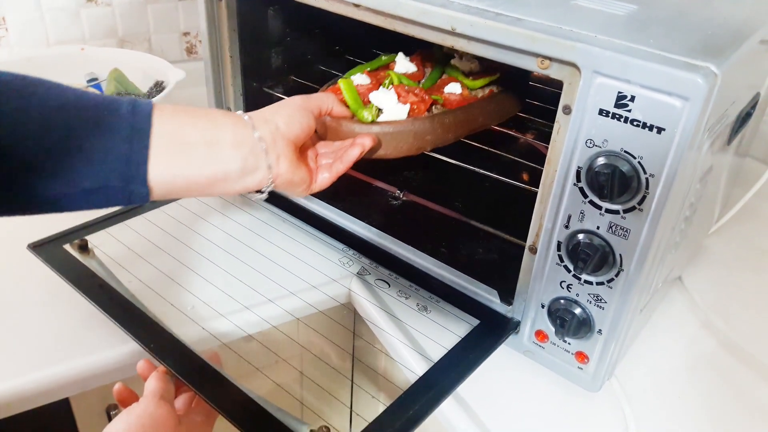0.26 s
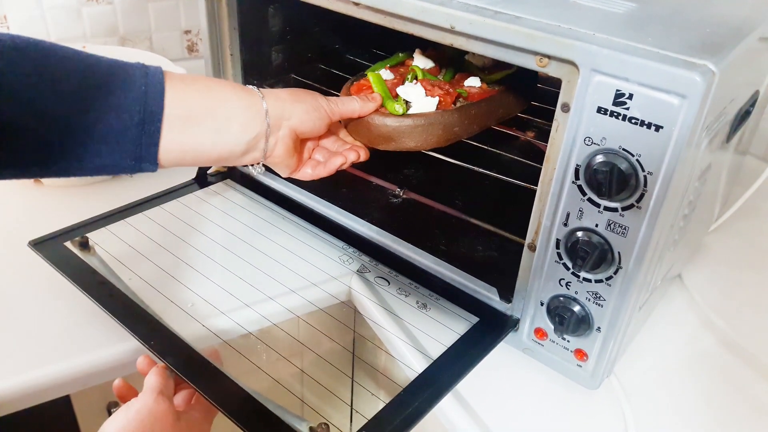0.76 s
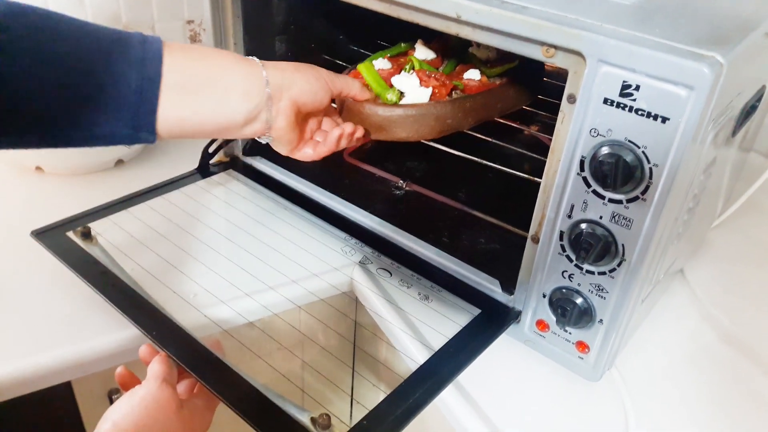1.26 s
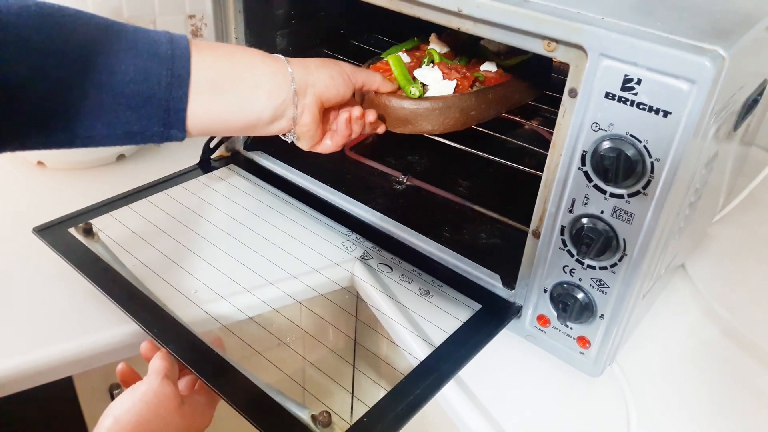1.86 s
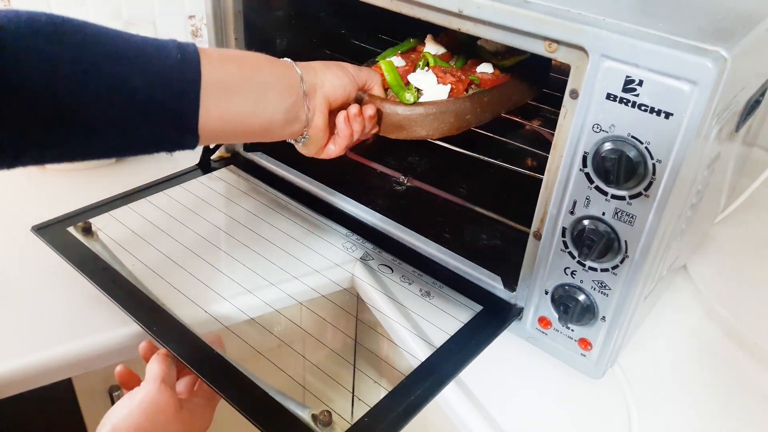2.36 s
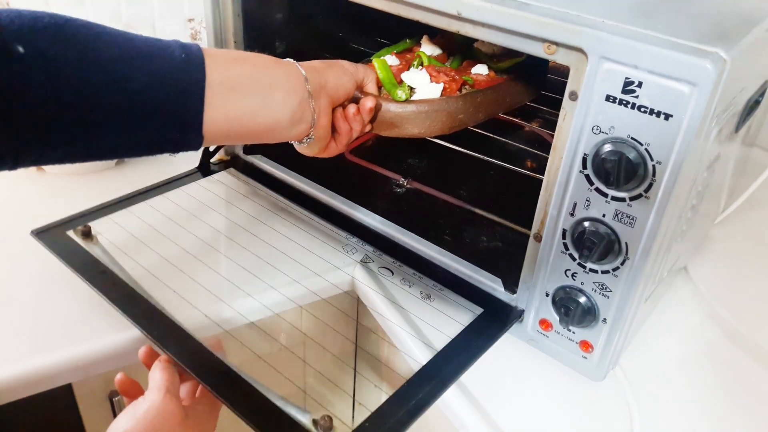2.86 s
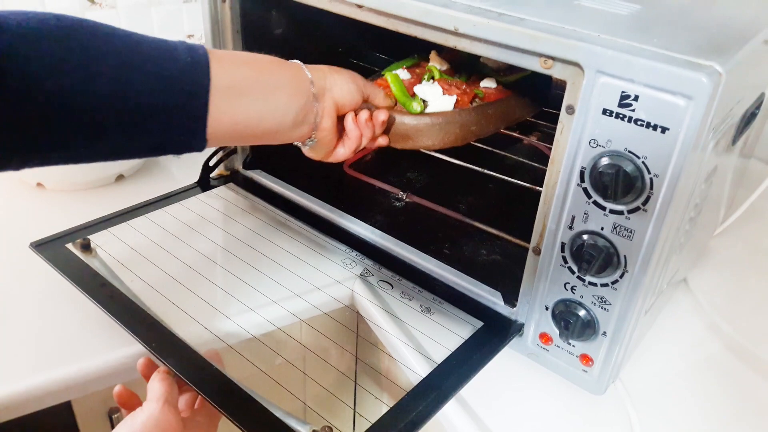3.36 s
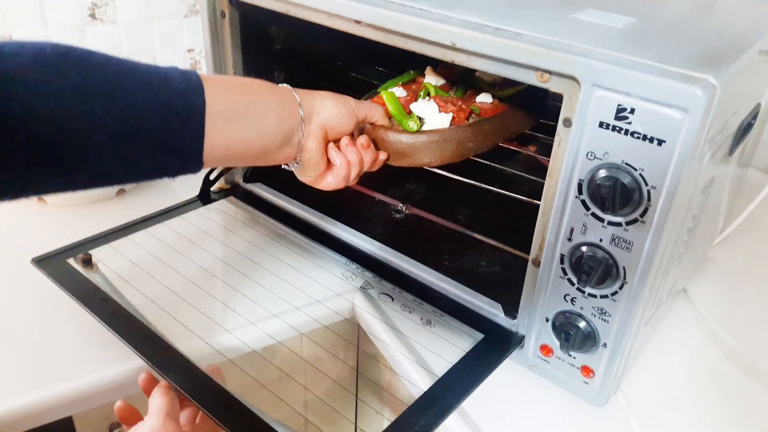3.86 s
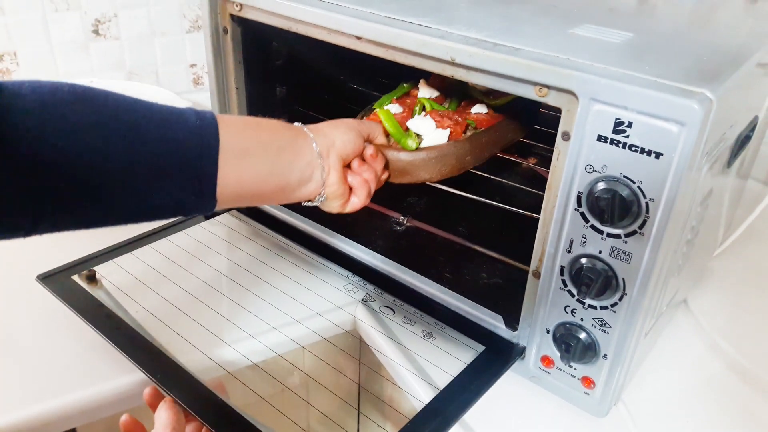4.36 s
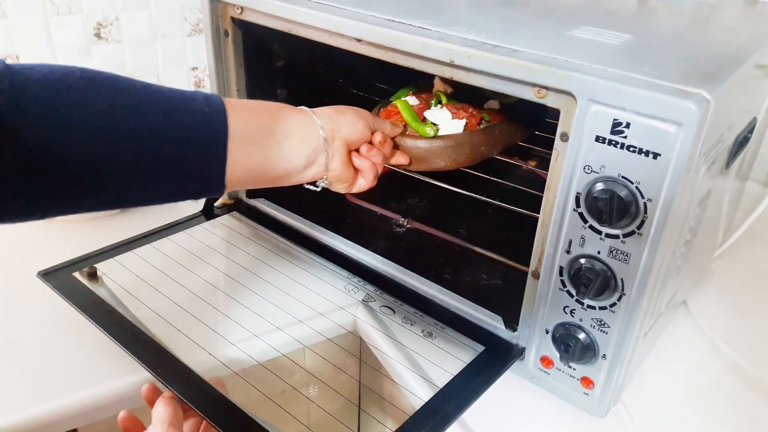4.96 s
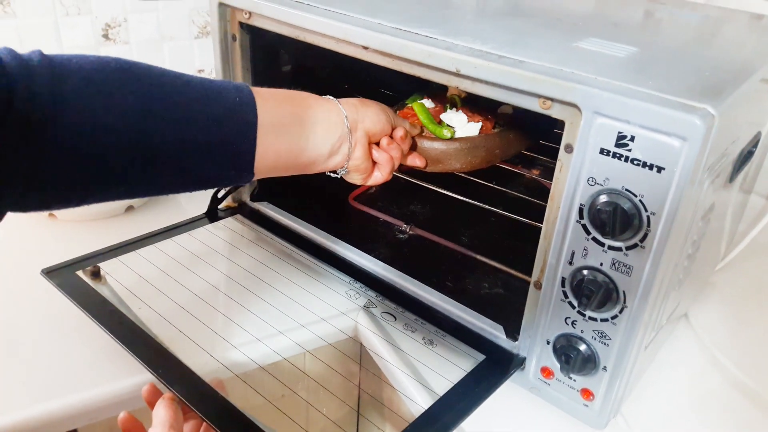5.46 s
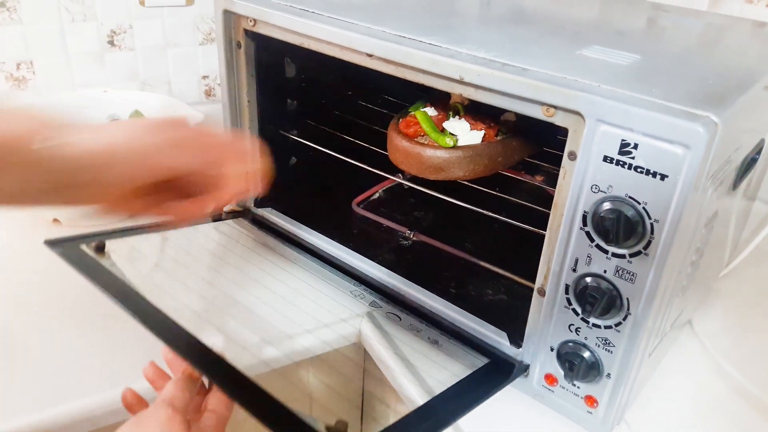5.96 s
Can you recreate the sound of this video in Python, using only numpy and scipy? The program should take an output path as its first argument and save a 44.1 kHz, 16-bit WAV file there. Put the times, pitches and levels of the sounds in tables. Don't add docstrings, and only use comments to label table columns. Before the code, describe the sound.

Close, jerky scraping of a clay dish over oven rack wires, with hard knocks, clinks and tinny hum, while a bird chirps faintly.

```python
import sys
import numpy as np
from scipy import signal
from scipy.fft import rfft, irfft
from scipy.io import wavfile
from scipy.ndimage import uniform_filter1d

SR = 44100
rng = np.random.default_rng(int(sys.argv[2]) if len(sys.argv) > 2 else 0)


def rack_gain(trim_db):
    fader = np.asarray(trim_db, float)
    return 10 ** (fader / 20)


def persist_wave(psi):
    counts = np.round(np.clip(psi, -1, 1) * 32767).astype(np.int16)
    wavfile.write(sys.argv[1], SR, np.atleast_2d(counts).T)


N = 273323

# (start [s], length [s], grind [dB], shell drone re grind [dB], bite re grind [dB])
SHOVES = [(-.03, 0.075, -42, 0, -4.5), (0.079, 0.049, -34, -1.5, -4), (0.167, 0.12, -35.5, -1, -5),
          (0.275, 0.12, -35.5, -4.5, -6.5), (0.37, 0.11, -37.5, -4, -4), (0.46, 0.062, -29.5, -9, -3),
          (0.515, 0.022, -37, 6, -20), (1.106, 0.092, -42.5, 0, -5.5), (1.215, 0.21, -51, 3, 3),
          (1.41, 0.21, -43.5, 2, -5), (1.596, 0.058, -41.5, -2.5, -5), (1.637, 0.097, -48.5, 0, 0),
          (1.787, 0.053, -63.5, 15, -25), (2.11, 0.091, -46.5, 3, -6), (2.244, 0.041, -40, -10, -8.5),
          (2.317, 0.028, -49.5, 5.5, -13), (2.429, 0.071, -45, 6.5, -4), (2.519, 0.064, -44.5, 5, -4),
          (2.7, 0.095, -48, 6.5, -4), (2.805, 0.084, -50.5, 3.5, -5), (3.03, 0.028, -46, 4, -7.5),
          (3.089, 0.027, -32.5, -7, -4.5), (3.248, 0.053, -45.5, -5, -11), (3.332, 0.11, -47.5, 4.5, -6.5),
          (3.458, 0.029, -52, -17, -5), (3.675, 0.038, -59.5, 3.5, 0), (3.969, 0.036, -48.5, 3, -9),
          (4.027, 0.093, -40, 7.5, -3), (4.112, 0.093, -42, 4.5, -8), (4.257, 0.019, -45, 9.5, -10.5),
          (4.404, .09, -43.5, -1.5, -6), (4.484, 0.069, -29, -2, -6), (4.54, 0.085, -29, -2, -5.5),
          (4.823, 0.037, -50, 0, -11), (4.956, 0.088, -37, -1.5, -1.5), (5.08, .025, -36.5, 1, -2.5),
          (5.122, 0.031, -32.5, -1.5, -5.5), (5.227, 0.058, -36, -7, -6), (5.329, 0.028, -38.5, 3.5, 0),
          (5.38, 0.036, -39.5, -0.5, -5)]
# (frequency [Hz], density [dB per Hz])
CLAY_COLOUR = [(210, -11.5), (350, -13), (557, -4.5), (677, -12), (897, -10.5), (1080, -8.5), (1430, -4),
               (1610, -6), (3360, -4.5), (6500, -30.5), (8450, -52.5), (14300, -120)]
# (frequency [Hz], density [dB per Hz])
GRIT_COLOUR = [(2940, -29), (5000, 12), (5300, 6), (6320, 4.5), (6630, 2), (8420, 0), (9930, -16),
               (11800, -8), (14300, -12), (16000, -28)]
# (frequency [Hz], density [dB per Hz])
BITE_COLOUR = [(1200, -31.5), (2200, -3), (3000, -0.5), (4400, 1.5), (5300, -5.5), (6400, -9.5),
               (8500, -31)]


def slide():
    # (frequency [Hz], width [Hz], level [dB])
    dish = [(670, 48, -2.5), (981, 49, -13), (1060, 14, -8), (1180, 8.3, -15.5), (1440, 11.7, -11),
            (1710, 69, -20.5), (1950, 34, -24), (2200, 14, -73), (2600, 32, -63), (3123, 32, -5.5),
            (4360, 91, -23), (5450, 99, -31), (6440, 110, -26)]
    grind_db, _, grit_db, _, _ = sliding()
    grains = evened(bumps(1400, 4.0, 0.55) * judder(1.0, size=600))
    shaken = grains * rack_gain(grind_db)
    touch = wander(3.5, 20, count=len(dish))
    rings = sum(rack_gain(db) * ring(shaken * gain, hz, width) for (hz, width, db), gain in zip(dish, touch))
    body = rack_gain(-0.5) * colour(shaken, CLAY_COLOUR) + rack_gain(-10.5) * rings
    grit = colour(shaken * rack_gain(grit_db), GRIT_COLOUR)
    return body + grit + colour(grains * rack_gain(bite()), BITE_COLOUR)


def sliding():
    # (time [s], grit re grind [dB], drone pitch [Hz], rack hum re grind [dB])
    spot = [(0, -15, 195.8, -4), (.25, -22.5, 202.7, -5.5), (.45, -15.5, 193.3, -23), (.7, -19, 218.6, 3),
            (1.151, -18.5, 179, -3.5), (1.5, -18, 194.9, -17), (2.1, -4, 185, -2), (2.3, -39, 186.7, -21),
            (2.5, -11, 191.4, -1), (3.101, -36, 205.5, -11), (3.45, -37, 196.3, 6.5), (3.8, 7, 199.1, -31),
            (4.1, -24, 195.3, -10), (4.35, -52, 183.7, 5), (4.501, -21, 194, 5), (4.649, -20, 213.8, -11),
            (5.0, -12, 199, -5.5), (5.45, -29, 204.1, -2.5)]
    shake = 221, -28.5, 80, -71.5
    grind_db = strokes([row[:3] for row in SHOVES])
    drone_db = strokes([(s, length, db + more) for s, length, db, more, _ in SHOVES], *shake)
    s, *columns = np.transpose(spot)
    grit_db, drone_hz, hum_db = (np.interp(np.arange(N) / SR, s, c) for c in columns)
    return grind_db, drone_db - grind_db, grit_db, drone_hz, hum_db


def bite():
    return strokes([(s, length, db + more) for s, length, db, _, more in SHOVES])


def strokes(rows, release_db_per_s=324, creep_db=-17, creep_db_per_s=72, rest_db=-67.5):
    grip_s = 0.044
    t = np.arange(0, N / SR + 0.01, 0.002)
    power = np.full(len(t), rack_gain(rest_db) ** 2)
    for start, length, db in rows:
        after = np.maximum(t - start - length, 0)
        grip = np.clip((t - start) / grip_s + 0.44, 0, 1)
        fall = rack_gain(-release_db_per_s * after) + rack_gain(creep_db - creep_db_per_s * after)
        power += (grip * rack_gain(db) * fall) ** 2
    return np.interp(np.arange(N) / SR, t, 10 * np.log10(power))


def bumps(per_s, spread_db, hiss):
    size = rack_gain(spread_db * np.minimum(rng.exponential(1, N), 4)) * rng.choice([-1, 1], N)
    clicks = evened(size * (rng.random(N) < per_s / SR))
    return evened(clicks + hiss * rng.standard_normal(N))


def judder(depth_db, size):
    return rack_gain(depth_db * evened(uniform_filter1d(rng.standard_normal(N), size)))


def knocks():
    # (frequency [Hz], level [dB], t60 [s])
    wire_rings = [(662, -10, 0.3), (977, -15, 0.14), (1362, -17, 0.18), (1950, -17, 0.3), (2130, -15, .18),
                  (2360, -20, .2)]
    # (time [s], level [dB], frequency [Hz], t60 [s])
    clinks = [(1.185, -34, 680, 0.022), (2.25, -46, 740, 0.04), (2.49, -40.5, 540, .1),
              (2.735, -40, 1520, 0.047), (3.098, -30, 1200, 0.048), (3.1, -31.5, 920, 0.078),
              (3.11, -40, 950, .06), (3.4, -29, 2130, 0.089), (1.605, -35.5, 1100, 0.064),
              (1.4, -30, 2000, 0.03), (3.371, -27, 1950, 0.031), (3.376, -34, 1000, 0.05),
              (.49, -36, 620, 0.082), (4.032, -33, 672, 0.15), (4.572, -29, 580, 0.055),
              (5.128, -26, 680, 0.036)]
    t = np.arange(6000) / SR
    out, crack, tick, blows = np.zeros((4, N))
    hits = contacts()
    chatter = rng.standard_normal((len(hits), len(t)))
    rise = 1 - np.exp(-t / 0.0007)
    for (s, db, low_hz, high_hz, _, tick_db), noise in zip(hits, chatter):
        add(crack, s, rack_gain(db - 7 - 60 * t / 0.087) * rise * noise)
        add(tick, s, rack_gain(db + tick_db - 1.5 - 60 * t / 0.044) * rise * noise)
        add(blows, s, rack_gain(db - 60 * t / 0.009) * noise)
        low = rack_gain(-9.0 - 60 * t / 0.045) * np.sin(2 * np.pi * low_hz * t)
        high = rack_gain(-4.0 - 60 * t / 0.023) * np.sin(2 * np.pi * high_hz * t)
        add(out, s, rack_gain(db) * rise * (low + high))
    for s, db, hz, t60 in clinks:
        fade = rack_gain(db - 60 * (t / min(t60, 0.085)) ** 2)
        add(out, s, fade * (1 - np.exp(-t / 0.00088)) * np.sin(2 * np.pi * hz * t))
    wires = sum(rack_gain(db) * ring(blows, hz, 2.2 / min(t60, 0.3)) for hz, db, t60 in wire_rings)
    cracks = colour(crack, CLAY_COLOUR) + rack_gain(-5.0) * colour(crack, BITE_COLOUR)
    return out + cracks + colour(tick, GRIT_COLOUR) + rack_gain(-11.0) * wires


def contacts():
    # (time [s], peak [dB], low ring [Hz], high ring [Hz], tick re peak [dB])
    hard = [(.079, -34, 660, 1950, -17), (.093, -27.5, 1060, 2500, -24), (2.525, -35, 1410, 2750, -29),
            (4.552, -16, 1921, 4210, -13), (4.596, -21, 680, 3000, -4), (5.097, -28.5, 1060, 2880, -12),
            (5.129, -23.5, 655, 1510, -15), (5.417, -31.5, 1440, 3000, -9), (0.108, -19, 1200, 2905, -6.5),
            (0.477, -22, 680, 2060, -7), (0.513, -16.5, 1440, 1950, -13), (1.417, -26.5, 1440, 3000, -7),
            (1.6, -18, 1280, 2080, -11.5), (2.133, -25, 1320, 2110, -34), (2.241, -36, 1830, 4140, -14),
            (2.248, -22.5, 670, 2730, -32), (2.715, -26, 1610, 2180, -16), (3.093, -16.5, 1130, 3090, -6.5),
            (3.365, -27.5, 1300, 1700, -8), (3.37, -20.5, 1430, 2260, -31), (4.027, -18, 684, 2600, -20),
            (4.035, -18.5, 698, 1920, -11), (4.108, -17.5, 1120, 2250, -26),
            (4.255, -18, 1670, 2150, -17.5), (4.482, -13.5, 1600, 3540, -10.5),
            (4.507, -16, 1535, 1750, -7), (4.571, -14.5, 670, 1710, -16), (4.96, -21.5, 646, 2280, -9),
            (5.148, -28, 680, 2050, -5), (5.239, -24, 625, 2336, -14), (5.269, -22.5, 644, 3350, -23),
            (5.331, -23, 1060, 1950, -12), (5.384, -23, 1440, 3030, -7.5)]
    # (time [s], peak [dB], low ring [Hz], tick re peak [dB])
    light = [(.205, -35, 1060, -8), (.288, -32, 1220, -6), (.745, -47, 696, -6.5), (1.135, -39, 990, -22),
             (1.345, -36, 1190, -28), (1.663, -32, 1440, -4), (1.727, -39, 1183, -1),
             (1.8, -48.5, 1060, -1.5), (2.9, -36, 990, -23), (3.333, -48, 1190, -5), (3.14, -30, 1060, -23),
             (0.647, -42, 1070, -5), (1.096, -41, 1180, -12), (1.173, -29, 1060, -30),
             (1.184, -55, 575, -32), (1.364, -33.5, 1470, -3), (1.483, -30, 1060, -5.5),
             (1.564, -27.5, 1440, -28), (1.833, -39.5, 754, -26), (2.147, -30, 597, -33),
             (2.327, -30, 1270, -40), (2.436, -39.5, 674.6, -5.5), (2.49, -38, 570, -22),
             (2.545, -41, 716, -16), (2.766, -30, 670, -33), (3.029, -32.5, 1010, -18),
             (3.062, -32, 597, -15), (3.287, -29, 1410, -39), (3.504, -35.5, 610, -11),
             (3.646, -43.5, 610, -7), (3.695, -39, 1060, -23), (3.988, -33.5, 1060, -11),
             (4.179, -25.5, 690, -24), (4.378, -33.5, 1490, -40), (4.855, -34.5, 646, -6.5),
             (5.078, -29, 646.5, -26), (5.499, -55, 1060, 3.5), (5.765, -52, 622, -3),
             (6.03, -51, 1070, -5)]
    knock_thump_db, tap_thump_db, tap_high_hz = -16, -7.5, 1877
    knocked = [(s, db, low, high, knock_thump_db, tick) for s, db, low, high, tick in hard]
    tapped = [(s, db, low, tap_high_hz, tap_thump_db, tick) for s, db, low, tick in light]
    return knocked + tapped


def snaps():
    # (time [s], peak [dB])
    grains = [(0.1087, -12), (0.2, -29), (0.306, -26), (0.3206, -29), (0.3295, -20), (0.4129, -26),
              (0.5025, -18), (0.5151, -13), (1.2777, -32), (1.4207, -24), (1.5687, -22), (1.602, -24),
              (1.626, -28), (1.664, -27), (1.7383, -29), (2.138, -28), (2.1942, -31), (2.2539, -34),
              (2.3295, -37), (2.5306, -26), (2.718, -35), (3.0479, -33), (3.096, -21), (3.1395, -33),
              (3.1456, -39), (3.2929, -39), (3.3705, -17.5), (3.506, -37), (3.819, -40), (3.9934, -27),
              (4.0645, -34), (4.2578, -39), (4.4018, -38), (4.451, -27), (4.461, -33), (4.4889, -12),
              (4.5088, -9), (4.618, -24), (4.8566, -38), (4.9987, -16), (5.0304, -26), (5.0445, -19),
              (5.1007, -31), (5.1292, -27), (5.1508, -26), (5.2406, -28), (5.2693, -29), (5.3397, -30),
              (5.387, -15), (5.4372, -34)]
    t, out = np.arange(600) / SR, np.zeros(N)
    pulse = -np.exp(-((t - 0.0002) / 0.00009) ** 2)
    for (s, db), noise in zip(grains, rng.standard_normal((len(grains), len(t)))):
        add(out, s, rack_gain(db - 3.5) * (pulse + rack_gain(-18.5 - 60 * t / 0.013) * noise))
    return out


def shell():
    # (frequency [Hz], width [Hz], level [dB])
    panels = [(114, 30, -8.5), (161, 45, -5), (244.5, 20, -3.5), (410, 76, -30)]
    # (frequency [Hz], width [Hz], level [dB])
    rack = [(289, 17, -4), (306.5, 32, -16.5), (320, 110, -57)]
    # (time [s], level [dB], frequency [Hz], t60 [s])
    struck = [(.01, -34, 193.2, 0.33), (0.079, -21, 192, 0.22), (0.301, -24, 203.2, 0.36),
              (.25, -28, 253, 0.11), (0.549, -32, 307, 0.18), (0.691, -40, 195, .2),
              (2.442, -32.5, 289, 0.21), (2.529, -39, 204, 0.19), (2.931, -34.5, 193.5, 0.5),
              (3.039, -32.5, 308.6, 0.066), (3.1, -28.5, 316, 0.13), (2.312, -47, 193, 0.15),
              (0.179, -17.5, 201, 0.27), (2.054, -42, 187.3, 0.19), (4.419, -22.5, 222, 0.13),
              (5.419, -22, 191, 0.079), (2.6, -24, 210, 0.089), (2.765, -24, 207, 0.14),
              (3.136, -28.5, 205, 0.16), (0.216, -21, 308.5, 0.15), (.476, -14.5, 195, 0.13),
              (1.481, -56, 189, 0.14), (2.138, -18.5, 307, 0.11), (2.151, -31, 180, 0.59),
              (2.248, -24, 181, 0.27), (3.027, -22, 190, 0.12), (4.03, -26.5, 206, 0.57),
              (4.108, -30, 185, 0.19), (4.483, -22, 173, 0.15), (4.556, -17, 300, 0.13),
              (4.959, -35, 180, 0.24), (5.061, -27, 303.2, 0.17), (5.14, -31, 196, .24),
              (5.386, -35, 213, 0.14), (5.49, -46, 307.5, 1.6), (5.489, -54, 278.5, 0.7),
              (1.835, -37.5, 382, 0.096)]
    grind_db, drone_db, _, drone_hz, hum_db = sliding()
    push = evened(rng.standard_normal(N) * judder(2.9, size=700)) * rack_gain(grind_db)
    boom = push * rack_gain(drone_db)
    slip_hz = drone_hz * wander(0.4, 30, count=1)[0]
    slip_gain = rack_gain(grind_db + drone_db - 25.0) * judder(3.6, size=900)
    slips = slip_gain * np.sin(2 * np.pi * np.cumsum(slip_hz) / SR)
    drone = resonate(rack_gain(-3.5) * boom + slips, drone_hz, 64.5)
    out = rack_gain(-19.5) * resonate(drone, drone_hz, 64.5)
    out += sum(rack_gain(db) * ring(boom, hz, width) for hz, width, db in panels)
    out += sum(rack_gain(db) * ring(push * rack_gain(hum_db), hz, width) for hz, width, db in rack)
    t = np.arange(16000) / SR
    thump = rack_gain(-60 * t / 0.1) * np.sin(2 * np.pi * 184 * t) * (1 - np.exp(-t / 0.00027))
    for s, db, _, _, thump_db, _ in contacts():
        add(out, s, rack_gain(db + thump_db + 0.5) * thump)
    swell = (1 - np.exp(-t / 0.0056)) * np.cos(np.pi / 2 * t / t[-1])
    for s, db, hz, t60 in struck:
        add(out, s, rack_gain(db - 60 * t / t60) * np.sin(2 * np.pi * hz * t) * swell)
    return signal.sosfilt(signal.butter(4, [100, 450], "band", fs=SR, output="sos"), out)


def cavity(x, turns_per_s):
    turn = np.pi * turns_per_s * np.arange(N) / SR
    shares = [np.sqrt(2 / 3) * np.cos(turn + k * np.pi / 3) for k in range(3)]
    return sum(echoes(x * share, 0.17, 0.0006) for share in shares)


def echoes(x, t60_factor, gap_s):
    # (frequency [Hz], likeness [0-1])
    echo_same = [(60, 0.95), (200, 1), (350, 0.55), (700, 0.71), (1400, 0.067), (3000, 0.0091),
                 (12000, 0.1)]
    # (frequency [Hz], t60 [s])
    kitchen = [(100, 0.47), (500, 0.52), (2000, 0.26), (5000, 0.23), (12000, 0.19)]
    hz, t, (a, b) = signal.stft(rng.standard_normal((2, SR // 2)), SR, nperseg=256)
    same = np.clip(read(echo_same, hz), 0, 1)[:, None]
    shared, apart = a * np.sqrt((1 + same) / 2), b * np.sqrt((1 - same) / 2)
    fade = rack_gain(-60 * t / (t60_factor * read(kitchen, hz)[:, None]))
    tail = signal.istft(np.array([shared + apart, shared - apart]) * fade, SR, nperseg=256)[1]
    tail = tail * (np.arange(tail.shape[1]) / SR > gap_s)
    return signal.fftconvolve(x[None], tail / np.linalg.norm(tail[0]), axes=1)[:, :N]


def bird():
    # (time after start [s], pitch [Hz], level [dB], warble depth [Hz])
    shape = [
        (0, 4500, -14, 200),
        (.01, 4750, -3.5, 283),
        (.024, 4750, 2, 310),
        (.038, 4500, -4.5, 400),
        (0.058, 3200, -10.5, 303),
        (.086, 3900, -9, 302),
        (.11, 3425, -6, 300),
        (.135, 3700, -15.5, 248.5),
        (0.149, 3040, -18, 100),
    ]
    # (time [s], level [dB], pitch factor [ratio])
    calls = [
        (0.935, -39, 1.016),
        (1.24, -38.5, 0.98),
        (1.62, -40, 0.95),
        (2.713, -39, 1.01),
        (3.112, -42, 0.98),
        (3.79, -41, .98),
        (4.083, -46.5, 1.01),
        (4.43, -41.5, 0.98),
        (4.75, -39.5, 1.006),
        (5.345, -41.5, 0.94),
    ]
    s, *columns = np.transpose(shape)
    t = np.arange(0, s[-1], 1 / SR)
    hz, db, warble_hz = (np.interp(t, s, c) for c in columns)
    out = np.zeros(N)
    for (start, level_db, factor), phase in zip(calls, rng.random(len(calls))):
        pitch = factor * hz + warble_hz * np.sin(2 * np.pi * (170 * t + phase))
        add(out, start, rack_gain(level_db + db) * np.sin(2 * np.pi * np.cumsum(pitch) / SR))
    return out * judder(2.5, size=80)


def hush():
    # (frequency [Hz], density [dB per Hz])
    air_colour = [(15, -51), (25, -21), (33, -12), (212, 1.5), (242, -9), (270, -1.5), (659, -7), (840, -8),
                  (911, -10), (988, -9), (1740, -11), (2990, -16), (5430, -28), (8400, -25), (10000, -33),
                  (12000, -25.5), (16000, -27)]
    # (frequency [Hz], likeness [-1 to 1])
    air_same = [(60, 1), (240, 1), (950, 0.04), (3770, 0.03), (15000, 0.01)]
    # (frequency [Hz], width [Hz], level [dB])
    whines = [(1842, 81, -66), (1700, 12, -70), (573, 36, -72), (82.4, 9.4, -70.5), (5500, 760, -94)]
    frames, hz = N // 256 + 5, np.fft.rfftfreq(1024, 1 / SR)
    a, b, c, d, patches = rng.standard_normal((frames, 513, 5)).T
    patches = evened(uniform_filter1d(uniform_filter1d(patches, 12, 0), 14, 1))
    same = np.clip(read(air_same, hz), -1, 1)[:, None]
    left = a + 1j * b
    right = same * left + np.sqrt(1 - same ** 2) * (c + 1j * d)
    z = np.array([left, right]) * rack_gain(1.5 * patches) * rack_gain(read(air_colour, hz)[:, None])
    air = evened(signal.istft(z, nperseg=1024, noverlap=768)[1][:, :N])
    noise = rng.standard_normal((2, N))
    whine = sum(rack_gain(db) * np.array([ring(v, f, width) for v in noise]) for f, width, db in whines)
    whine = whine * wander(4.6, 6, count=1)[0]
    return rack_gain(-58.5) * np.array([np.roll(air[0], 17), air[1]]) + whine


def evened(x):
    return x / np.sqrt(np.mean(x ** 2) + 1e-20)


def read(points, hz):
    f, value = np.transpose(points)
    return np.interp(np.log(hz + 1), np.log(f + 1), value)


def add(mix, s, sound):
    part = mix[round(s * SR):][:len(sound)]
    part += sound[:len(part)]


def colour(x, points):
    size = 4096
    gain_db = np.maximum(read(points, abs(np.fft.fftfreq(size, 1 / SR))), -90)
    log_gain = np.log(rack_gain(gain_db))
    taps = np.fft.ifft(np.exp(log_gain - 1j * signal.hilbert(log_gain).imag)).real[:size // 2]
    return signal.oaconvolve(x, taps / np.linalg.norm(taps))[:len(x)]


def ring(x, hz, width):
    r = np.exp(-np.pi * width / SR)
    return signal.lfilter([2 * np.sqrt(1 - r)], [1, -r * np.exp(2j * np.pi * hz / SR)], x).real


def resonate(x, hz, width):
    turn = np.exp(2j * np.pi * np.cumsum(hz * np.ones(len(x))) / SR)
    r = np.exp(-np.pi * width / SR)
    return (turn * signal.lfilter([2 * np.sqrt(1 - r)], [1, -r], x / turn)).real


def wander(depth_db, per_s, count):
    knots = np.arange(0, N / SR + 1, 1 / per_s)
    levels_db = depth_db * rng.standard_normal((count, 400))[:, :len(knots)]
    return [rack_gain(np.interp(np.arange(N) / SR, knots, v)) for v in levels_db]


def scene():
    cut = signal.butter(2, 300, "high", fs=SR, output="sos")
    grind, blows = signal.sosfilt(cut, [slide(), knocks() + snaps()])
    bass, chirps = rack_gain(-4.0) * shell(), bird()
    direct = rack_gain(-5.0) * grind + rack_gain(-2.5) * blows + bass
    near = np.array([direct, np.roll(direct, 2)])
    near += cavity(rack_gain(-2.5) * grind + rack_gain(-2.5) * blows, 9)
    near += rack_gain(-8.0) * echoes(grind + blows + bass, 1.13, 0.0047)
    far = rack_gain(-4.5) * chirps + rack_gain(-1.5) * echoes(chirps, 1.47, 0.0017)
    return near + far + hush()


def roll_off(x):
    return signal.sosfilt(signal.butter(12, 16280, fs=SR, output="sos"), x)


def record(dry):
    # (frequency [Hz], left minus right [dB])
    port_tilt = [(60, -5.5), (150, 0.5), (380, 1), (950, -1), (2380, -0.5), (5000, 1.5), (8000, 5),
                 (11000, 3.5), (15000, 0.5)]
    hz, edge_hz = np.fft.rfftfreq(N, 1 / SR), 15830
    tilt = rack_gain(read(port_tilt, hz) / 2)
    gains = np.array([tilt, 1 / tilt]) * (hz < edge_hz)
    ports = irfft(rfft(dry, axis=1) * gains, N, axis=1)
    return roll_off(ports)


dry = scene()
out = record(dry)
persist_wave(out)
```